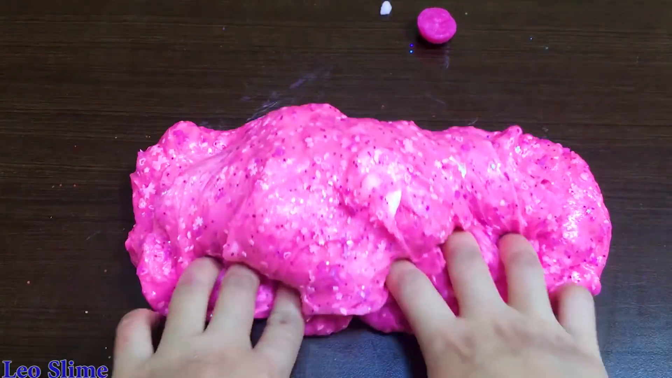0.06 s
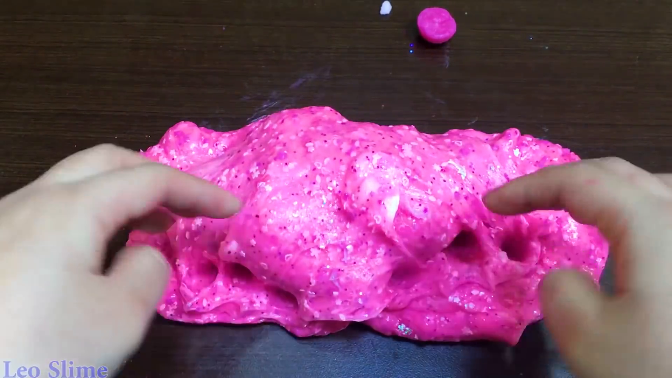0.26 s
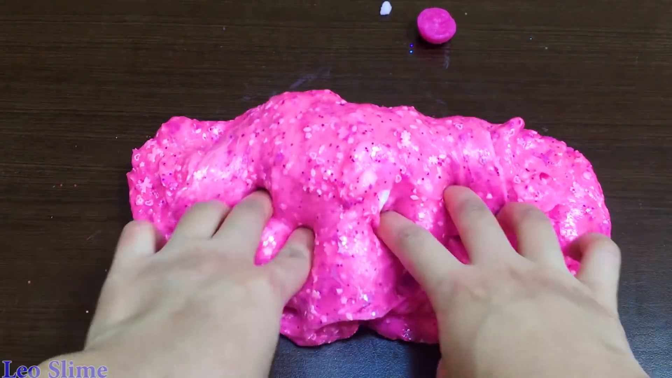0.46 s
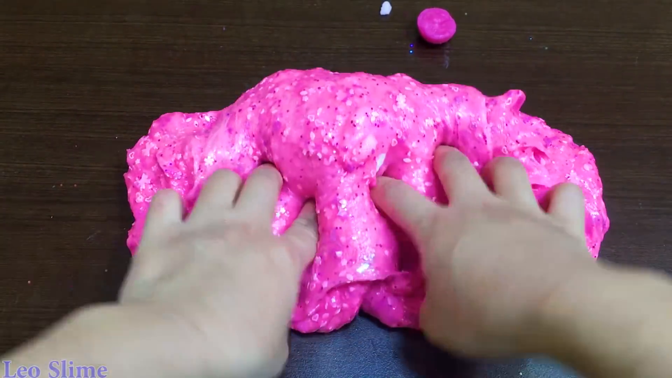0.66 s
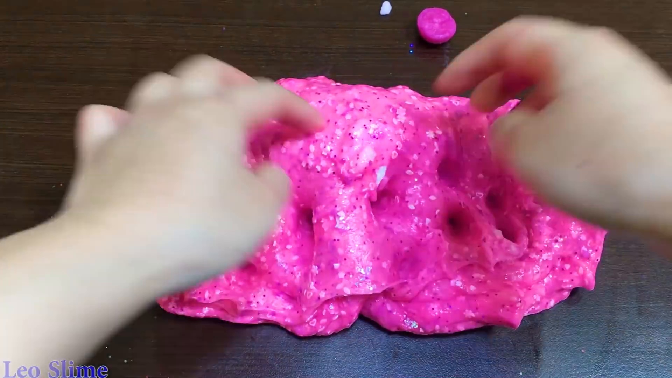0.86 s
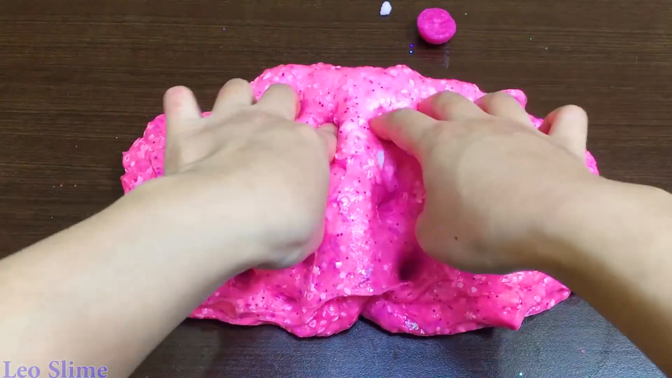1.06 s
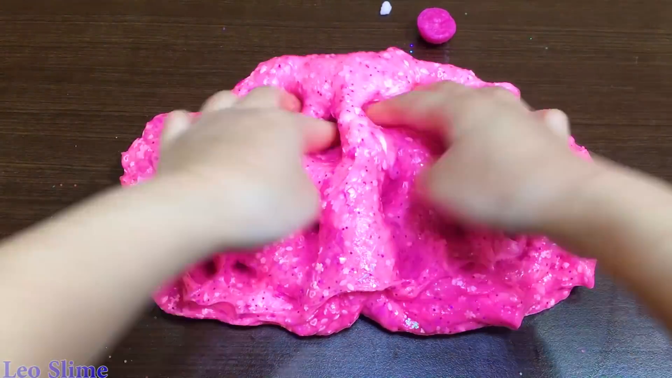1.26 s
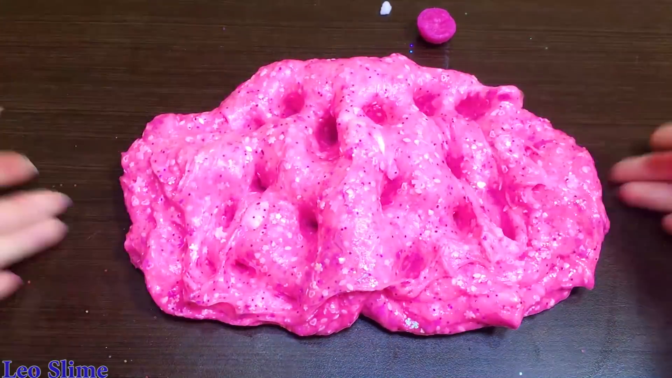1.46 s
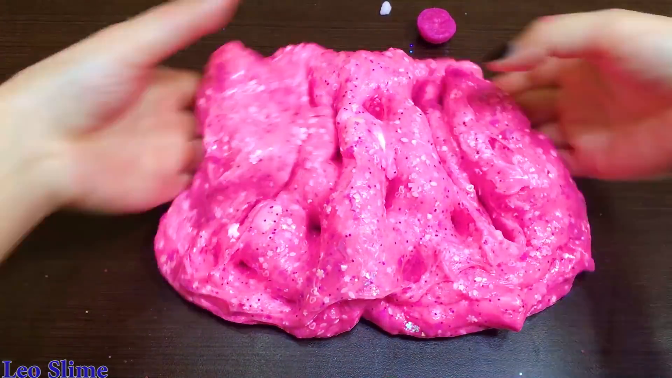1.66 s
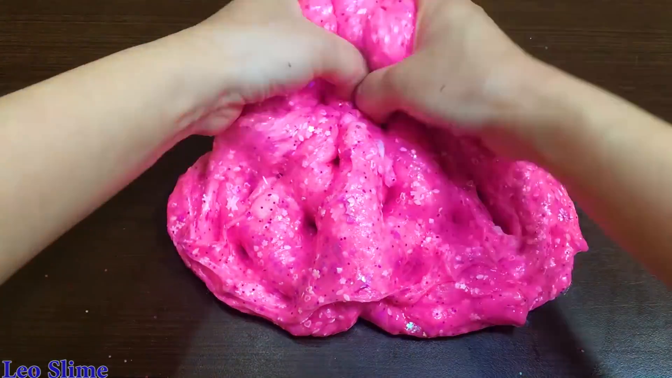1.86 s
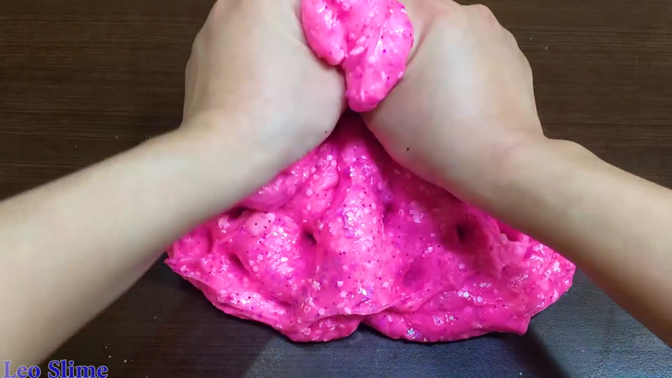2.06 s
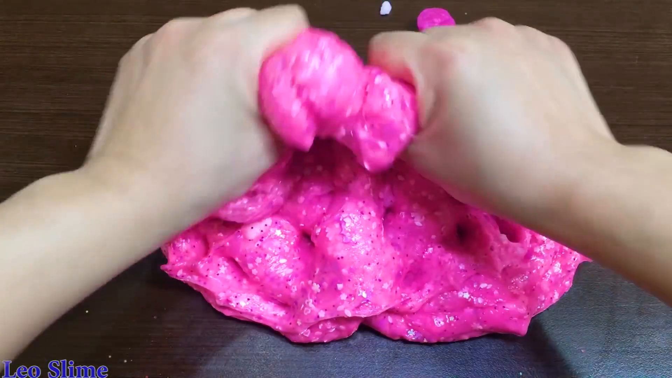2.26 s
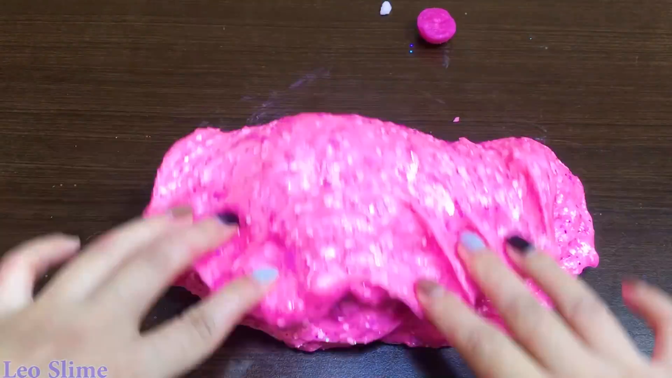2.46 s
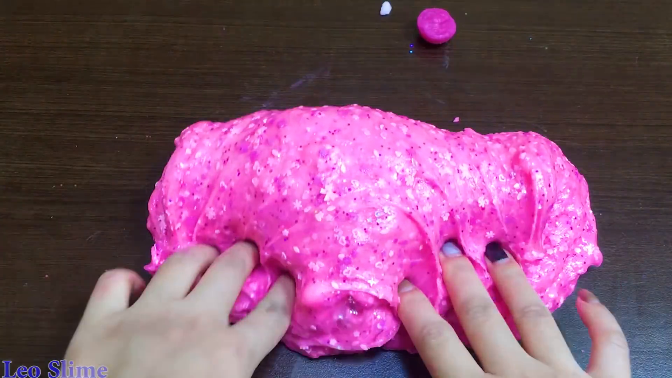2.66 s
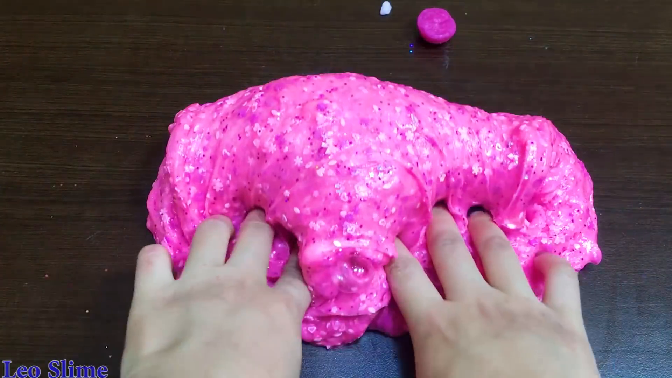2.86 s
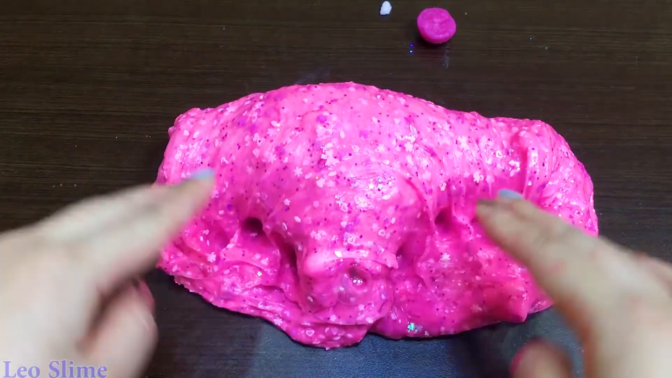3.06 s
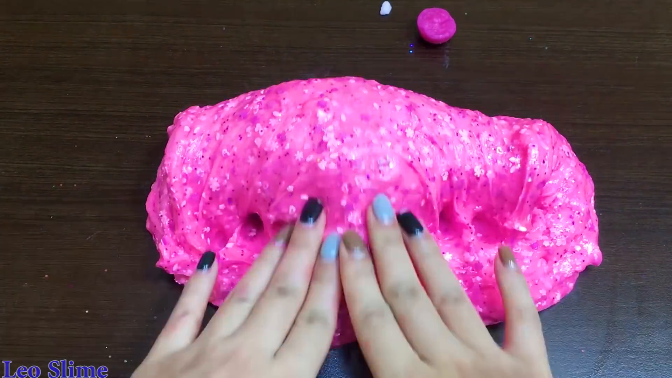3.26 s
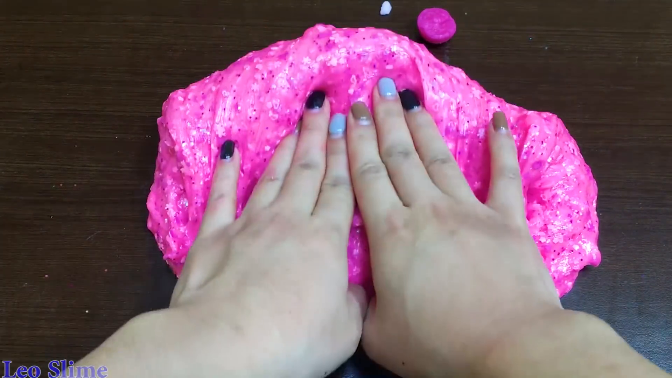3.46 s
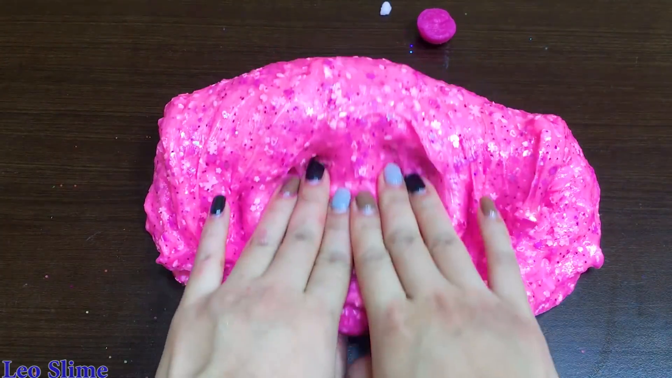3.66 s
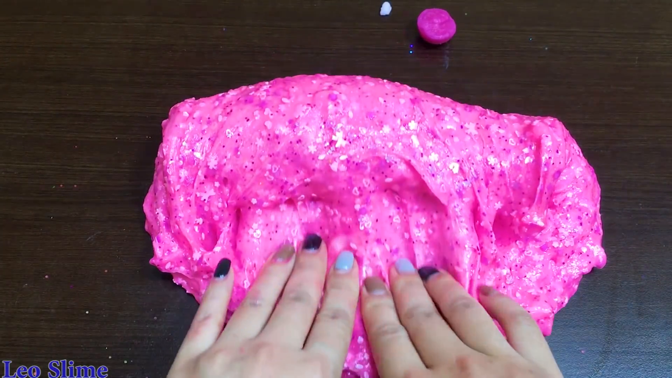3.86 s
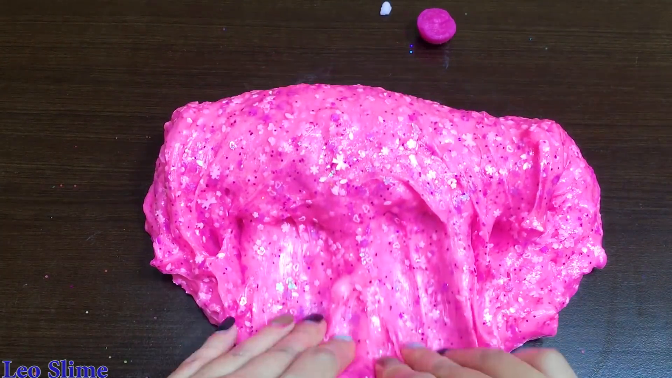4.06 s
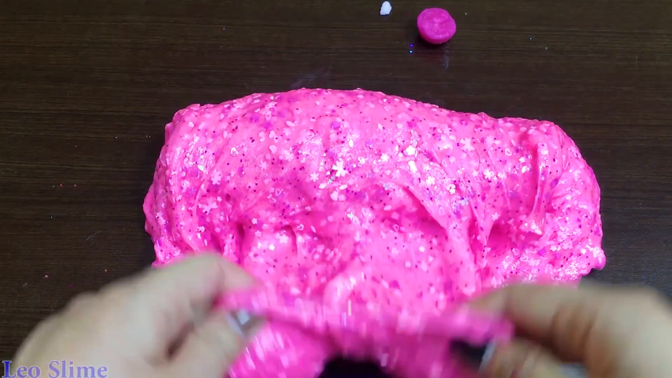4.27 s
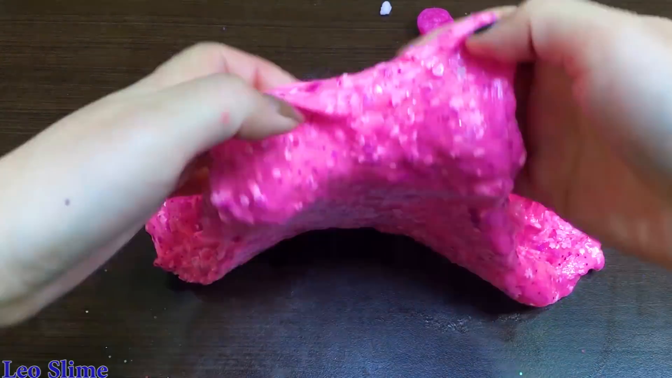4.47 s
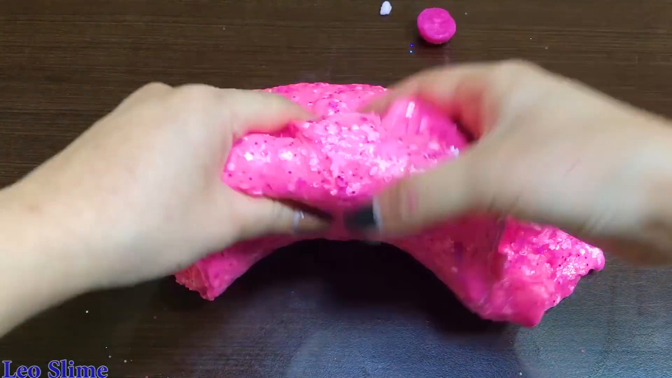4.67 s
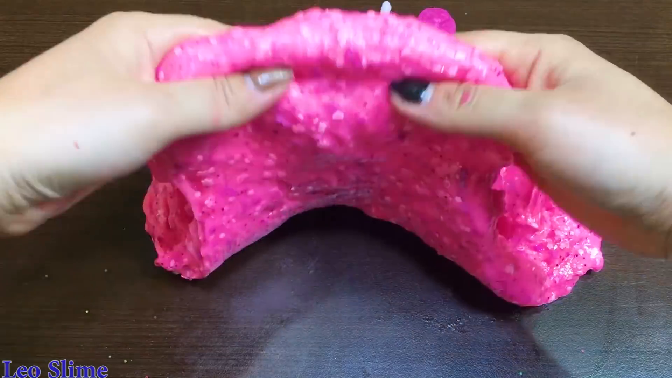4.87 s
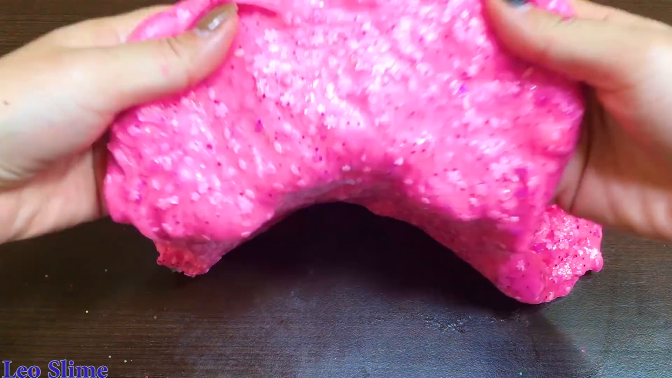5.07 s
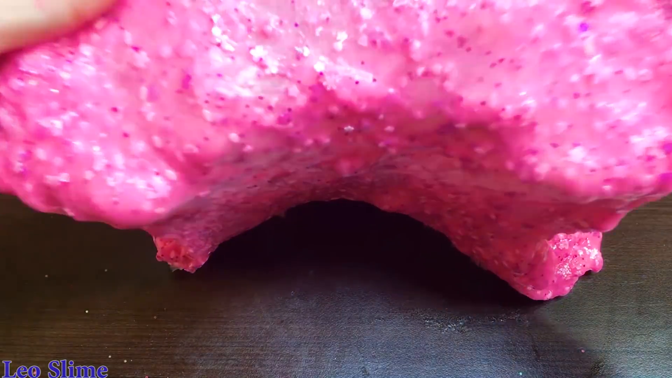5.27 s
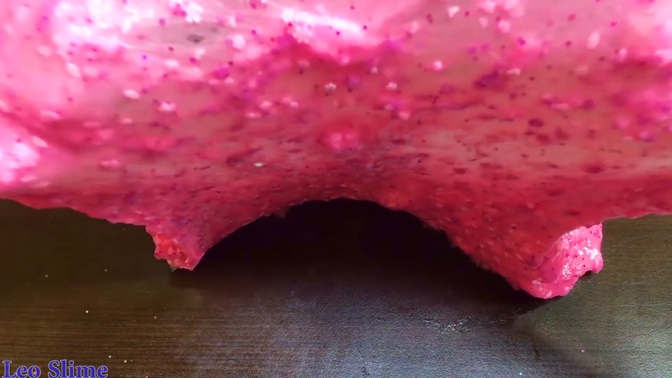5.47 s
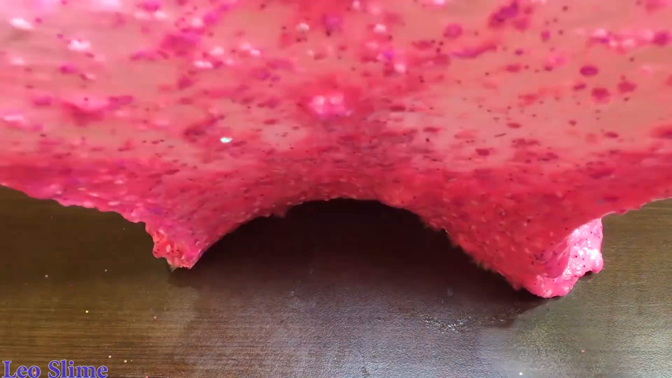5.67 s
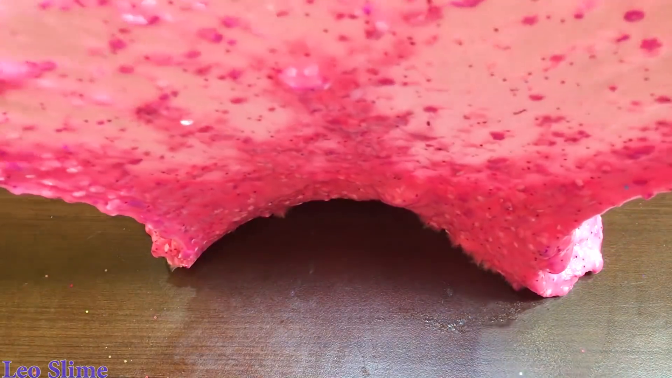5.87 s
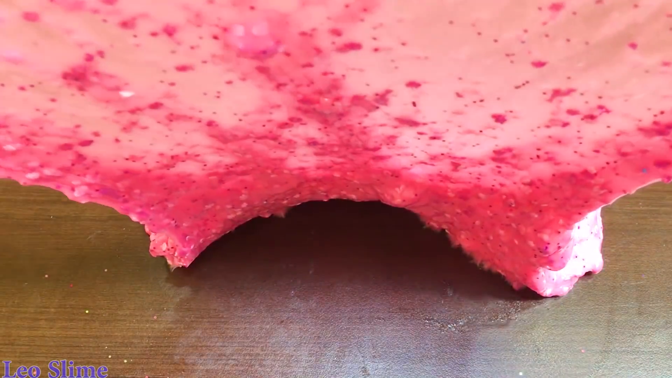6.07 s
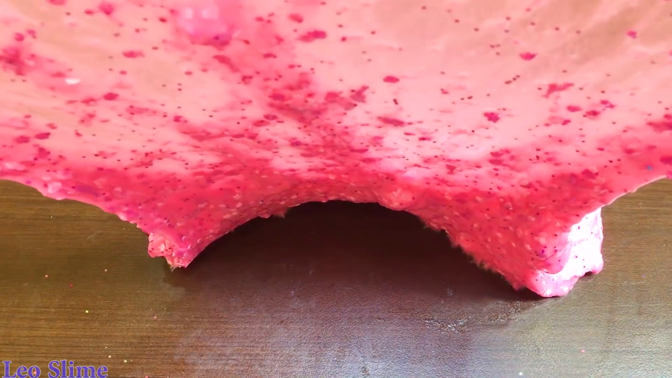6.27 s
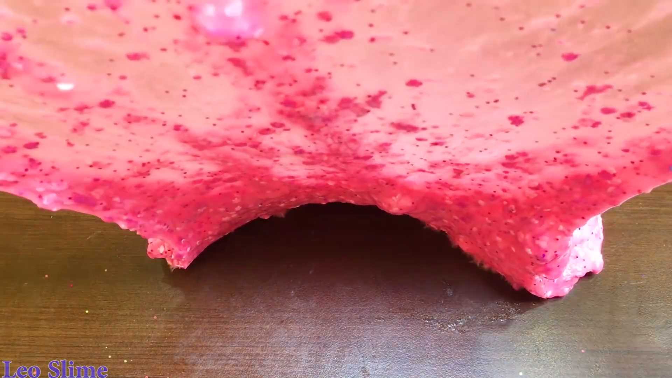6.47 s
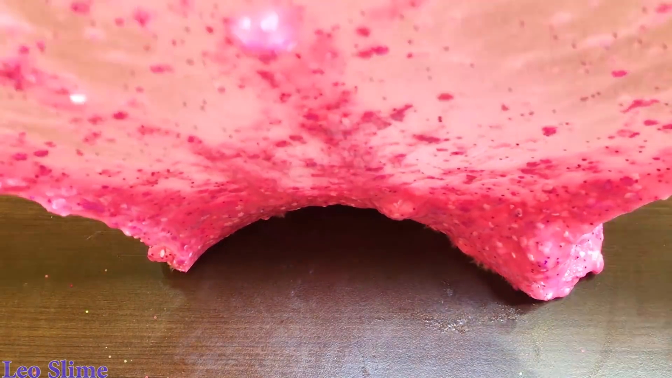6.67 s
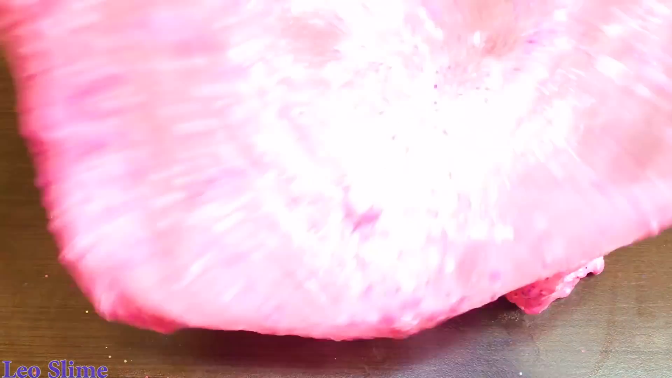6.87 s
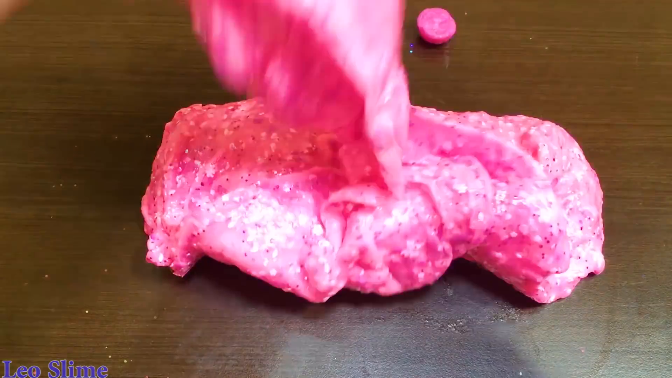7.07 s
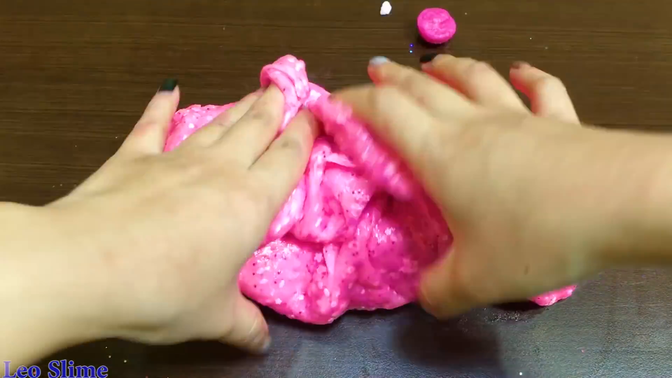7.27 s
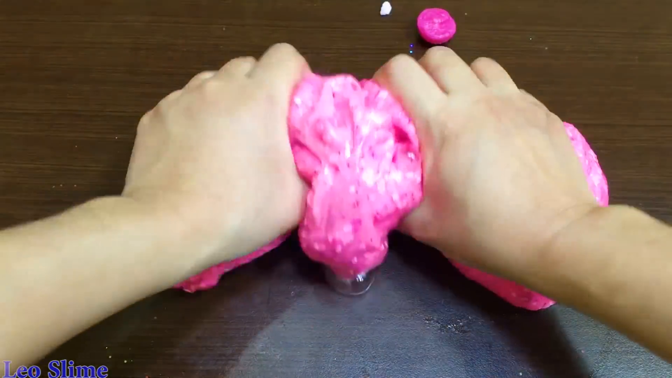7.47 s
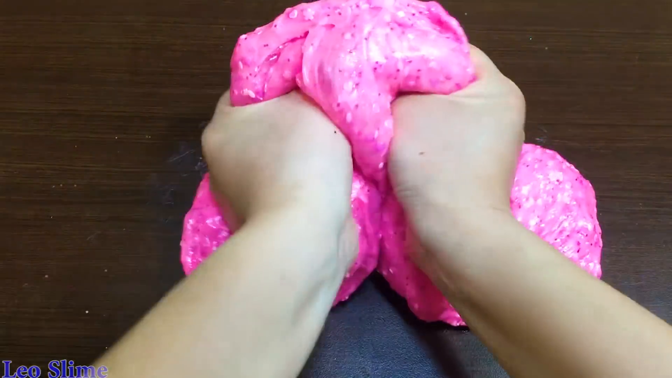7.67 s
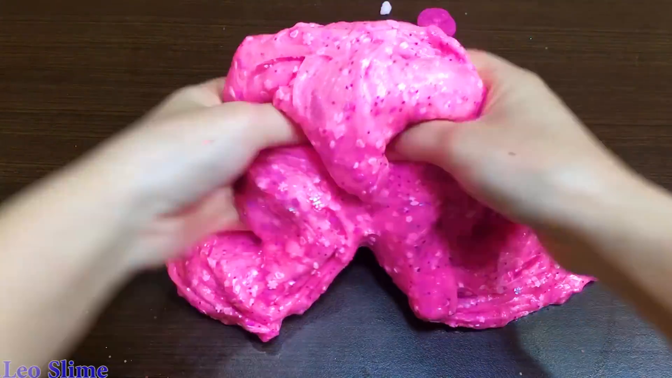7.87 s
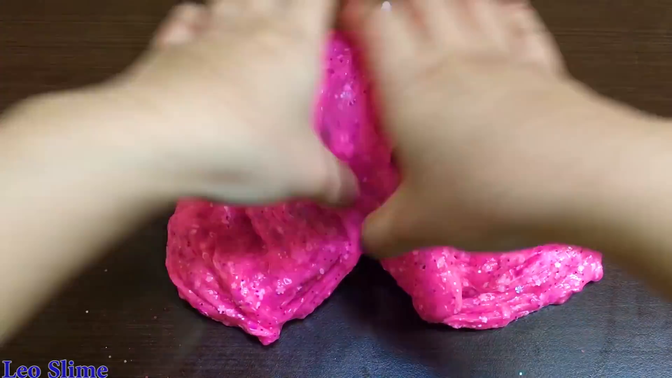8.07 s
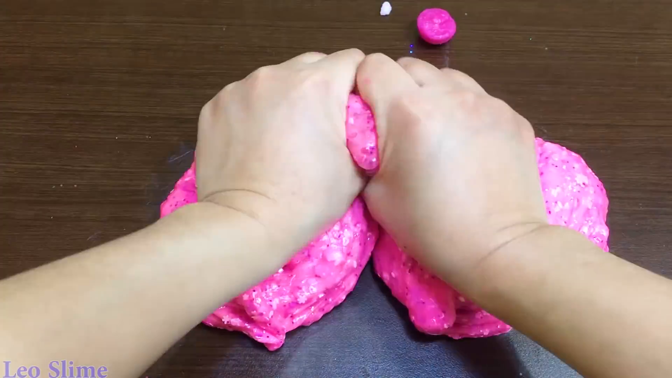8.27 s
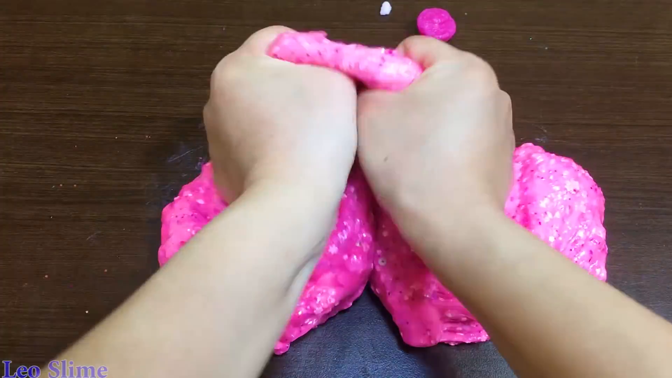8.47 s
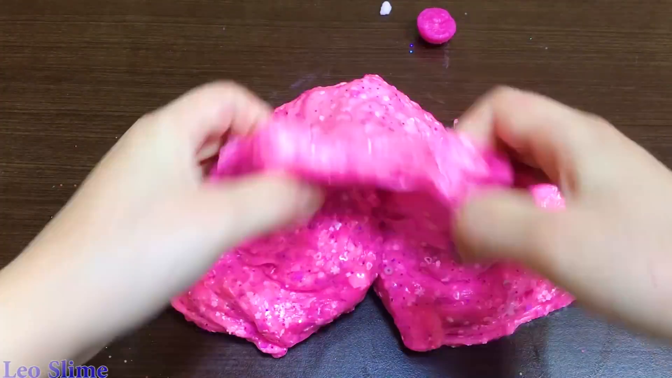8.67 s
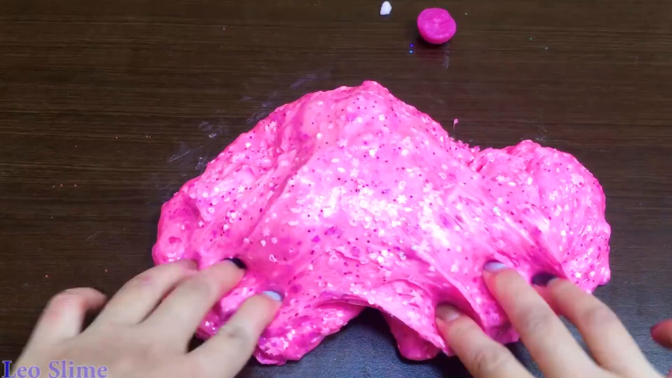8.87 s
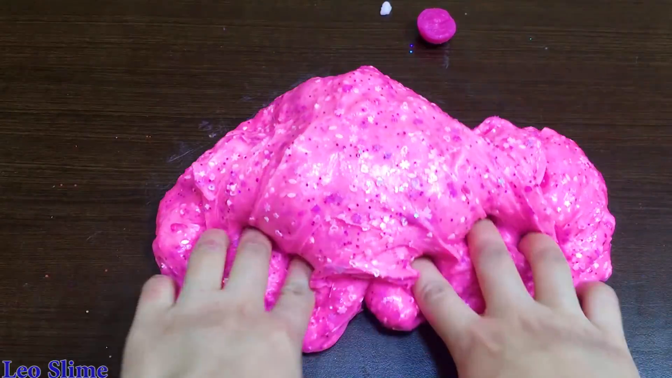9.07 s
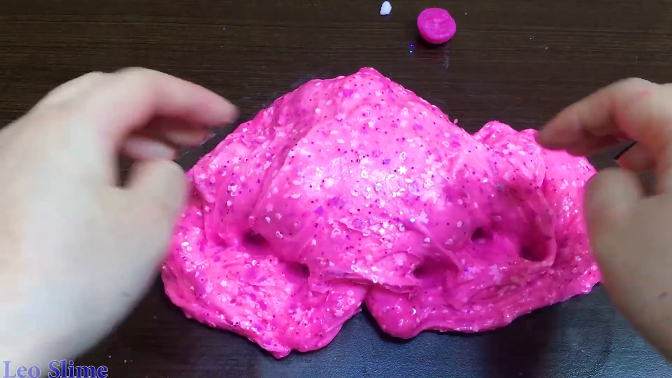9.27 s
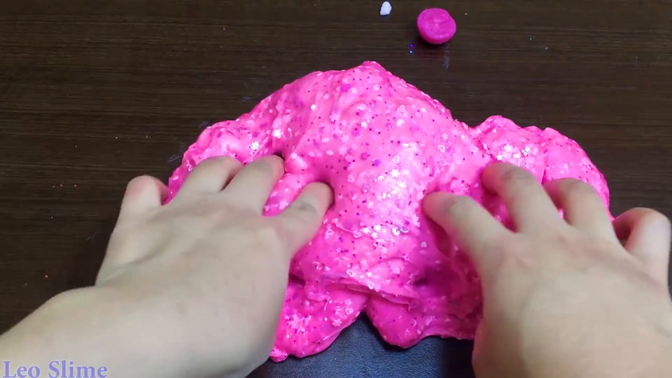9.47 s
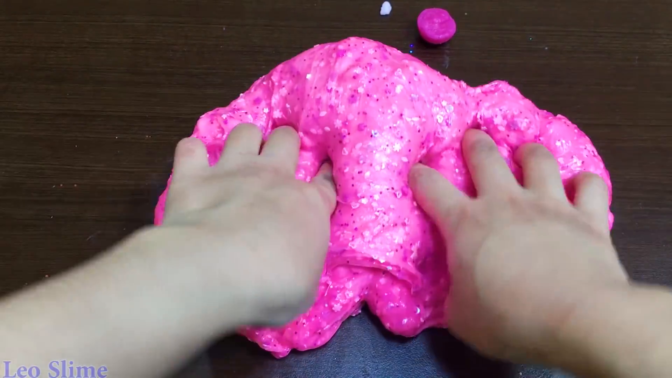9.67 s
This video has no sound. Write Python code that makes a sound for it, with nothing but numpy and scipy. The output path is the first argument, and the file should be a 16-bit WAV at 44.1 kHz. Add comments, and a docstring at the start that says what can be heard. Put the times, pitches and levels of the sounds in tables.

```python
"""Hands poke, fold and stretch sticky slime on a wooden table, close to one microphone.
From the start air pockets pop and the slime rips off the fingers, while pushes shake the table's modes.
From 1.7 s it crackles under squeezes and pulls as its threads snap, then thins to a lull near 6.5 s.
From 7 s to 9.4 s pops, rips and squeezes crowd together. A small room hums quietly throughout."""
import sys
import numpy as np
from scipy import signal
from scipy.fft import rfft, irfft
from scipy.io import wavfile
from scipy.ndimage import uniform_filter1d

SR = 44100
rng = np.random.default_rng(int(sys.argv[2]) if len(sys.argv) > 2 else 0)


def transcribe(u):
    """Save the signal u as a 16-bit wav file named by the first command-line argument.

    u: samples, shape (n,) or (channels, n), limited to [-1, 1]; the rate is SR.
    q: integer samples, one column per channel.
    """
    v = np.clip(np.atleast_2d(u).T, -1, 1)
    q = np.round(v * 32767).astype(np.int16)
    wavfile.write(sys.argv[1], SR, q)


N = 428652

# table top modes: f/Hz, level/dB, base t60/s
TABLE_MODES = [(54.1, 3.5, 1.0), (110.36, -3.5, 0.3), (167.7, -7, 0.25), (231.6, -2.5, 0.24),
               (323.2, -10.5, 0.56), (368, -11.5, 0.6)]


def pops():
    """An opening air pocket rings as a short tone while the film around it tears."""
    # t/s, relative level/dB, pocket f/Hz, low tear/dB, bright snap/dB, time scale/ms
    pockets = [(0.0212, -15, 1280, -22.5, -11, 1.96), (0.0744, -25, 12500, -6, 10, 0.5),
               (0.097, -21, 1750, -25, -23, 0.88), (0.1195, -27, 6960, -24, 1.5, 3.5),
               (0.3318, -22.5, 7450, -27, -13, 2.3), (0.3368, -14, 7200, -14, 11, 2.7),
               (0.3459, -5.5, 1470, -11, -2, 1.3), (0.3632, -25, 7160, -22, 17, 9.6),
               (0.888, -4.5, 4380, -0.5, -6, 4.5), (0.9144, -17, 4700, -8, -40, 3.7),
               (1.047, -43, 9100, -29, -5, 1.1), (1.098, -28.5, 14200, -14.5, -24, 3.2),
               (1.2487, -38.5, 2640, -18, -39, 1.1), (1.4515, 4.5, 4670, -9, -11.5, 1.15),
               (1.4677, -17, 1720, 7, -8, 3), (1.657, -24.5, 960, 2, -8.5, 2.1),
               (1.814, -23.5, 11300, 0, -13, 2.2), (1.941, -24, 1650, -5, -19, 1.5),
               (1.952, -10.5, 6250, -8.5, -38, 1.36), (1.979, -18, 9600, -27, 0, 0.91),
               (1.9882, -25, 2660, -20, -14, 1.1), (2.0332, -4.5, 5630, -5.5, -42, 1.7),
               (2.042, -1.5, 9060, -22, -12, 0.3), (2.0892, -23.5, 4720, -25, -13, 0.56),
               (2.1186, -23, 2090, -28, -19, 0.8), (2.149, -25, 2120, -8.5, 2, 2.5),
               (2.1673, -26.5, 6670, -19, 7, 0.66), (2.2114, -12, 1540, -11.5, -7.5, 1.2),
               (2.2148, -16.5, 5750, -17, 4, 1.8), (2.26, -16.5, 960, 3.5, -12, 1.3),
               (2.2773, -10, 6800, -1, -0.5, 0.84), (2.2821, -10, 5840, -38, 4, 0.42),
               (2.7167, -16, 1025, -28, -27, 2), (2.9236, -36, 6300, -30, 8, 0.66),
               (3.1269, -12.5, 1570, -11, -18, 1.7), (3.135, -19, 7120, -19, -15, 1.9),
               (3.147, -12.5, 7250, -53, 3, 2.2), (3.487, -11.5, 1370, -28, -26, 1.2),
               (3.6092, -22.5, 9070, -23, -10, 2.7), (3.876, -24, 4720, -31, -22, 3.1),
               (3.897, -26, 13600, -32, -5, 0.84), (3.9545, -28.5, 1500, -8, -7, 1.7),
               (3.9941, -25.5, 6800, -8.5, 12.5, 1.5), (4.04, -36, 6050, 1.5, -23, 0.9),
               (4.0644, -30.5, 9150, -33, 9, 0.89), (4.16, -19, 11300, -35, -9, 0.77),
               (4.2027, -21.5, 11800, -25, -3, 1.3), (4.216, -20.5, 12700, -34, 3, 1.4),
               (4.2843, -18.5, 1460, -17, -8, 1.7), (4.299, -26.5, 3000, -6, -5, 5.6),
               (4.4236, -27.5, 1130, -25, -17, 15), (4.4558, -35, 1080, -23, 8, 3.5),
               (4.4797, -25.5, 1120, -19, 3, 0.86), (4.5675, -35, 1500, -1, -10, 3.4),
               (4.5927, -36, 1045, -25, 11.5, 2.6), (4.7748, -34, 6300, 1, -6, 1.7),
               (4.8157, -22, 1980, -16, -15.5, 0.83), (5.1684, -22, 1430, -10, -15, 1.5),
               (5.1735, -30.5, 1280, -5, -13, 2), (5.2598, -27, 9500, -6, -22, 0.4),
               (5.3211, -34, 990, -6, -19, 2.5), (5.3712, -32, 1006, -21, 0, 1.4),
               (5.4227, -41, 1180, -11.5, -23, 2.5), (5.445, -40, 1050, -15, -25, 2.8),
               (5.6302, -38, 9060, -14, -1.5, 0.85), (5.696, -43, 2200, -11, -3, 0.81),
               (5.725, -41, 1255, -15, -24, 2.6), (5.899, -47, 1100, -8, -29, 2),
               (6.1942, -37, 990, -5, -27, 2.9), (6.222, -33, 960, -14, -32, 2.5),
               (6.988, -39, 12100, -22, -2, 6.5), (7.077, -12, 1516, -22, 7, 6.2),
               (7.0928, -9, 3830, -2, 4, 3.2), (7.0982, -17.5, 4020, 12.5, -1, 4.7),
               (7.1287, -20, 3150, 1, -5, 2.7), (7.387, -31.5, 1590, 6.5, -8.5, 3.3),
               (7.523, -23.5, 1030, -13, 5, 1.3), (7.574, -33, 990, -5, -23, 2.2),
               (7.583, -17, 1180, -6, -16.5, 1.8), (7.606, -19, 1190, -6, -14.5, 2.2),
               (7.618, -10, 885, -28, -31, 0.95), (7.635, -19, 1250, -27, -42, 12),
               (7.7072, -20, 12100, -32, -10, 2.2), (7.731, -29, 3450, 0, -6, 1.3),
               (7.752, -26, 5340, -30, -14, 3.4), (7.765, -21, 1840, -5, -6, 1.5),
               (7.7926, -18.5, 1250, -2.5, -17, 3.2), (7.8836, -4, 3490, -40, -7.5, 2.06),
               (8.0294, -24.5, 665, 5, -11, 9.1), (8.0524, -18, 2240, -25, -12, 3.2),
               (8.2996, -18.5, 2000, -11, -16, 0.8), (8.3341, -14.5, 1990, 4, -44, 5.4),
               (8.3415, -6.5, 1740, -13, -39, 1.1), (8.3635, -6.5, 2270, 10, -32, 1.2),
               (8.3656, -12, 1020, 5, -15, 2.9), (8.4171, -10, 1990, -0.5, -8, 1.5),
               (8.4246, 1, 3600, -4.5, -15, 0.4), (8.445, -5, 7100, -19, -12, 0.87),
               (8.449, -18.5, 6000, 2.5, -1, 2.3), (8.526, -6, 12600, -38, -5, 1),
               (8.5302, -4.5, 11890, -15, -7, 1.5), (8.5425, -15.5, 3560, -25, 1, 0.85),
               (8.549, -16.5, 10500, -26, 9, 0.71), (8.5785, -7.5, 3220, -33, -34, 1.1),
               (8.6312, -30, 2340, -2, -19, 3.7), (8.6938, -21.5, 3490, -4, -28, 0.57),
               (8.782, -23.5, 9900, 1, -16, 2.7), (8.99, -27.5, 1260, -9, -10, 2.3),
               (8.9975, -22.5, 1210, 4, -35, 0.23), (9.073, -26.5, 10100, -32, 5.5, 0.95),
               (9.087, -26, 12400, -33, -3, 1), (9.1362, -29.5, 6100, -7, -10, 0.8),
               (9.3467, -9.5, 3420, -1.5, 5, 2.6), (9.3748, -17.5, 3450, -11, -15, 3.2),
               (9.3784, -12, 1460, -16, -19, 2.7)]
    out, lead = np.zeros(N), 256
    t = (np.arange(2048) - lead) / SR
    draws = rng.standard_normal((len(pockets), 3, len(t)))
    for (s, db, hz, body_db, snap_db, ms), (noise, roughness, drift) in zip(pockets, draws):
        age = t / (ms / 1000)
        envelope = np.where(age < 0, np.exp(-(age / 0.1) ** 2), np.exp(-age / 0.66))
        wobble_rad = 0.53 * np.cumsum(drift) * hz / np.sqrt(4000 * SR)  # soft wall: pitch wavers
        tone = envelope * np.sin(2 * np.pi * hz * t + wobble_rad)
        tear = noise * amp(0.68 * roughness) * envelope
        tear[lead] += 3.0  # rupture click
        body = amp(body_db) * peaked(band(tear, 510, 2800))
        snap = amp(snap_db) * peaked(band(tear, 7000, 16000))
        middle = amp(min(body_db, snap_db) + 11.5) * peaked(band(tear, 1800, 9100))
        add(out, s - lead / SR, amp(db - 4.0) * (tone + body + snap + middle))
    return out


def stretch():
    """Snapping threads sound three pocket sizes at once: crackle, squelch and fizz."""
    crackle_gain, squelch_gain, fizz_gain = handwork()
    pull = threads(per_s=200, spread_db=5.0, clump_db=3.0)
    out = crackle_gain * crackle(*pull, 1500, 6800, cycles=5.4, hiss_gain=1.0)
    out += squelch_gain * crackle(*pull, 850, 1600, cycles=10.0, hiss_gain=1.1)
    return out + fizz_gain * crackle(*pull, 6500, 16000, cycles=1.3, hiss_gain=1.0)


def handwork():
    """Gains of crackle, squelch and fizz: creep, squeezes and rips add as power."""
    # slime creeping between gestures: t/s, base level/dB
    creep = [(0, -68), (1.2, -72), (1.6, -76), (2.4, -66), (3.3, -78), (3.7, -68), (4.7, -73), (5.5, -73),
             (6.1, -78), (6.7, -83), (7.2, -68), (8.2, -76), (9.1, -66), (9.5, -78), (9.72, -74)]
    # squeezes and pulls: t/s, hold/s, 20 dB swell and fade/s, crackle/dB, squelch/dB, fizz/dB
    squeezes = [(0.04, 0.088, 0.14, -59, -55, -60.5), (0.178, 0.058, 0.078, -54, -48, -54.5),
                (0.754, 0.021, 0.12, -63, -61, -83), (1.288, 0.037, 0.3, -66, -57.5, -66),
                (1.717, 0.13, 0.051, -47.5, -47, -49.5), (1.85, .14, 0.092, -50, -52, -56.5),
                (2.073, 0.16, 0.059, -51, -54, -51), (2.5, 0.011, 0.12, -47, -46.5, -43.5),
                (2.708, 0.072, 0.044, -52, -50.5, -50.5), (2.948, 0.019, 0.2, -61, -56, -62),
                (3.517, 0.077, 0.12, -63.5, -55.5, -67), (3.763, 0.034, 0.064, -60, -60.5, -56),
                (3.83, 0.21, .06, -65.5, -62, -62), (4.022, 0.078, .06, -65, -65, -60),
                (4.163, 0.15, 0.037, -57.5, -53.5, -53), (4.294, 0.12, 0.032, -48, -42, -52),
                (4.414, 0.056, 0.14, -48.5, -43.5, -49), (4.816, 0.09, 0.027, -62.5, -68, -68),
                (4.978, 0.011, 0.053, -49.5, -56.5, -53), (5.14, 0.025, 0.09, -56, -58, -55.5),
                (5.296, 0.12, 0.14, -69.5, -66.5, -63), (6.198, 0.019, .05, -70.5, -57.5, -75.5),
                (6.975, 0.0092, .05, -65, -63, -65.5), (7.127, 0.027, 0.033, -48, -52, -57),
                (7.299, .07, 0.15, -59, -61, -57.5), (7.52, .13, 0.021, -55, -48.5, -58),
                (7.666, 0.18, 0.15, -48, -47.5, -46.5), (7.966, 0.077, .06, -50, -52, -48.5),
                (8.029, 0.077, 0.023, -40.5, -39.5, -41), (8.34, 0.061, 0.071, -42, -48, -47.5),
                (8.442, 0.063, .05, -43, -46, -44.5), (8.565, 0.087, 0.058, -46, -51, -48.5),
                (8.699, 0.16, 0.038, -46.5, -49, -45.5), (8.916, 0.09, 0.04, -56, -58.5, -58.5),
                (9.06, .04, 0.074, -59, -74, -58), (9.195, 0.085, 0.18, -57.5, -51.5, -57)]
    # fingers ripping free: t/s, hold/s, crackle/dB, squelch/dB, fizz/dB
    rips = [(0.336, .008, -29.5, -27, -30), (0.363, 0.0058, -32, -30.5, -42),
            (0.881, 0.006, -30, -22.5, -41), (0.907, 0.0094, -30.5, -37.5, -31.5),
            (1.448, 0.031, -30, -34.5, -29), (1.646, 0.012, -41.5, -39.5, -68),
            (2.029, 0.011, -42, -52, -42), (2.275, 0.022, -40, -49, -39), (3.126, 0.03, -33, -36.5, -33.5),
            (3.477, .015, -67, -61, -57), (7.082, 0.012, -31, -34, -42), (7.88, 0.0066, -26.5, -50, -49),
            (8.414, 0.0083, -34.5, -42, -34.5), (8.535, .012, -40.5, -48, -38),
            (9.34, 0.0061, -41, -34, -33.5), (9.367, .01, -33.5, -36.5, -33)]
    creep_offsets_db = np.c_[[2, 3.5, 1]]
    settle_db_per_s = np.c_[[562.5, 333.5, 800]]  # large pockets close last
    t = np.arange(0, N / SR + .01, .001)
    power = amp(np.interp(t, *np.transpose(creep)) + creep_offsets_db) ** 2
    for s, hold_s, fade_s, *db in squeezes:
        away_s = np.maximum(np.maximum(s - t, t - s - hold_s), 0)
        power += amp(np.c_[db] - 20 * away_s / fade_s) ** 2
    for s, hold_s, *db in rips:
        loosen_db = (t < s) * (-19.5 + 10 * (t - s) / 0.032)  # grip creaks before letting go
        settle_db = settle_db_per_s * np.maximum(t - s - hold_s, 0)
        power += amp(np.c_[db] + loosen_db - settle_db) ** 2
    return [np.interp(np.arange(N) / SR, t, gain) for gain in np.sqrt(power)]


def threads(per_s, spread_db, clump_db):
    """Sparse snaps of sticky threads, a few large, and the uneven pull that breaks them."""
    sizes = amp(spread_db * np.minimum(rng.exponential(1, N), 4))
    snaps = sizes * (rng.random(N) < per_s / SR)
    quick, slow = (evened(uniform_filter1d(rng.standard_normal(N), n)) for n in (150, 1200))
    return snaps * rng.choice([-1., 1.], N), amp(clump_db * (quick + slow))


def crackle(snaps, clumps, lo_hz, hi_hz, cycles, hiss_gain):
    """Each snap rings a pocket of random pitch, over a wet hiss that comes in clumps."""
    pitches_hz = np.geomspace(lo_hz, hi_hz, num=12)
    pocket = rng.integers(0, len(pitches_hz), N)
    grains = sum(ring(snaps * (pocket == k), hz, cycles / hz) * np.sqrt(hz)
                 for k, hz in enumerate(pitches_hz))
    wet_hiss = clumps * band(rng.standard_normal(N), lo_hz, hi_hz)
    mix = evened(grains) + hiss_gain * evened(wet_hiss)
    return evened(band(mix, .8 * lo_hz, 1.2 * hi_hz))


def hisses():
    """Brief smooth bands of noise swell and fade."""
    # noise swells: t/s, length/s, level/dB, centre f/Hz
    swells = [(0.6, .125, -51.5, 7440), (4.29, 0.18, -49, 1190), (8.699, 0.17, -45, 2050),
              (9.669, 0.05, -60.5, 9000)]
    out, edge_ratio = np.zeros(N), 1.31
    for s, length_s, db, hz in swells:
        arch = np.sin(np.pi * np.linspace(0, 1, round(length_s * SR))) ** .4
        noise = band(rng.standard_normal(len(arch)), hz / edge_ratio, hz * edge_ratio)
        add(out, s, amp(db) * arch * evened(noise))
    return out


def pushes():
    """Short rough shoves ring the table's modes; hands and slime damp them."""
    # pushes and releases: t/s, level/dB, knock/dB, lowest mode offset/dB, t60 factor
    shoves = [(0.343, -25, 1.5, -14, 0.81), (0.503, -44, -18, -6, 0.97), (0.88, -28.5, 7, -9.5, 1),
              (1.456, -34.5, 8.5, -19.5, 0.55), (1.649, -36, 8.5, -15.5, 1), (1.789, -36, 3, -17, 0.6),
              (1.853, -38, 3.5, -20, 1), (2.024, -44, 9, -12, 0.6), (2.252, -58.5, 17, 2, 0.42),
              (3.123, -29.5, 5, -24, 0.87), (3.48, -44, 8.5, -19, 0.81), (3.84, -50, -3, -10, 0.54),
              (4.399, -42.5, 0.5, -9, .8), (5.119, -46.5, -4, -3, 0.35), (6.219, -42, -3, -15.5, 0.65),
              (6.996, -41.5, -16, -10, 0.84), (7.069, -27, 2.5, -26, 0.36), (7.297, -43, -3, -49, 0.46),
              (7.515, -30, -20, -16, 0.58), (7.58, -36, -22, -16, 1), (7.763, -34, -2.5, -18.5, 1),
              (8.023, -38, 11, -8.5, 0.94), (8.329, -34, 13.5, -27, 0.77), (8.537, -55.5, 23, -31, 0.81),
              (9.222, -40.5, -1.5, -13, 1), (9.368, -24.5, 0.5, -19.5, 0.54)]
    out, t = np.zeros(N), np.arange(SR) / SR
    envelope = np.exp(-t / 0.036) - np.exp(-t / 0.0022)  # the soft mass rubs as it settles
    for s, db, knock_db, deep_db, t60_factor in shoves:
        force = envelope * rng.standard_normal(SR)
        deep, *upper = (amp(mode_db) * peaked(ring(force, hz, t60_factor * t60_s))
                        for hz, mode_db, t60_s in TABLE_MODES)
        knock = amp(knock_db) * peaked(band(force, 170, 540))
        add(out, s, amp(db) * (peaked(sum(upper)) + amp(deep_db) * deep + knock))
    return out


def leaning():
    """Leaning hands keep the table's low modes humming and squish the whole mass."""
    # hand pressure: t/s, table hum/dB, squish/dB
    pressure = [(0.0, -53, -58), (1.35, -54.5, -63.5), (1.84, -57.5, -48.5), (2.11, -51.5, -55),
                (2.3, -64.5, -60.5), (2.9, -64, -61), (3.36, -56, -68), (3.95, -63.5, -65),
                (4.52, -58.5, -76.5), (5.12, -69, -63), (6.44, -68.5, -76), (6.79, -69, -78),
                (7.8, -54.5, -46), (8.23, -62, -67), (8.58, -52, -49), (9.09, -58.5, -64),
                (9.42, -50.5, -64), (9.72, -57.5, -62)]
    s, *levels_db = np.transpose(pressure)
    hum_gain, squish_gain = (amp(np.interp(np.arange(N) / SR, s, db)) for db in levels_db)
    force = rng.standard_normal(N)
    hum = sum(amp(db) * evened(ring(force, hz, 0.66 * t60_s)) for hz, db, t60_s in TABLE_MODES[:4])
    pull = threads(per_s=99, spread_db=2.3, clump_db=3.0)
    squish = crackle(*pull, 240, 600, cycles=5.7, hiss_gain=0.4)
    return hum_gain * evened(hum) + squish_gain * squish


def reflections(x):
    """Sparse wall reflections, each band dying at its own rate."""
    # room decay: f/Hz, t60/s
    walls = [(200, .45), (500, 0.11), (1000, .22), (2000, 0.22), (5000, 0.025), (14000, 0.12)]
    taps = np.zeros(SR // 2)
    slots = np.arange(120, len(taps) - 20, 20)
    taps[slots + rng.integers(0, 20, len(slots))] = rng.choice([-1., 1.], len(slots))
    hz, t, spectra = signal.stft(taps, SR, nperseg=256)
    decay = amp(-60 * t / read(walls, hz)[:, None])
    _, tail = signal.istft(spectra * decay, SR, nperseg=256)
    return signal.oaconvolve(x, tail / np.linalg.norm(tail))[:N]


def room_noise():
    """Steady low hum of the room with microphone hiss."""
    # noise spectrum: f/Hz, relative density/dB
    spectrum = [(18, -37.5), (30, -2.5), (64, 0.5), (194, -10.5), (227, -18.5), (252, -6), (569, -20),
                (913, -18), (5040, -33), (7090, -35.5), (16000, -34.5)]
    return amp(-63) * evened(coloured(rng.standard_normal(N), spectrum))


def amp(db):
    """Gain of a level in dB."""
    return 10 ** (np.asarray(db) / 20)


def evened(x):
    """Scales to rms 1."""
    return x / np.sqrt(np.mean(x ** 2) + 1e-20)


def peaked(x):
    """Scales to peak 1."""
    return x / (abs(x).max() + 1e-20)


def read(points, hz):
    """Value of a table on a log-frequency axis."""
    f, value = np.transpose(points)
    return np.interp(np.log(hz + 1), np.log(f + 1), value)


def add(mix, s, sound):
    """Mixes a sound in at time s."""
    part = mix[round(s * SR):][:len(sound)]
    part += sound[:len(part)]


def band(x, lo_hz, hi_hz):
    """Causal band-pass."""
    return signal.sosfilt(signal.butter(2, [lo_hz, min(hi_hz, SR / 2.1)], "band", fs=SR, output="sos"), x)


def ring(x, hz, t60):
    """One damped mode."""
    pole = np.exp((2j * np.pi * hz - np.log(1000) / t60) / SR)
    return signal.lfilter([1], [1, -pole], x).imag


def coloured(x, points):
    """Shapes a whole signal by a spectrum."""
    return irfft(rfft(x) * amp(read(points, np.fft.rfftfreq(len(x), 1 / SR))), len(x))


def scene():
    """Close slime, its reflections, the table and the room noise, in mono."""
    slime = pops() + stretch() + hisses()
    background = room_noise()
    return (slime + amp(-18) * reflections(slime) + pushes() + leaning() + background)[None]


def record(dry):
    """Microphone colour, clipping at full scale, band limit."""
    # microphone response: f/Hz, gain/dB
    response = [(30, -17), (60, 1.5), (1000, -3), (4500, 1.5), (9500, 2), (11000, -1), (12500, 1.5),
                (16000, -3.5)]
    clipped = np.clip(coloured(dry[0], response), -1, 1)
    lowpass = signal.firwin(301, cutoff=16300, window=("kaiser", 9), fs=SR)
    return signal.oaconvolve(clipped, lowpass, "same")[None]


dry = scene()
out = record(dry)
transcribe(out)
```